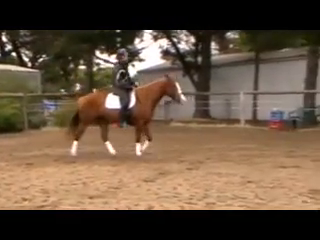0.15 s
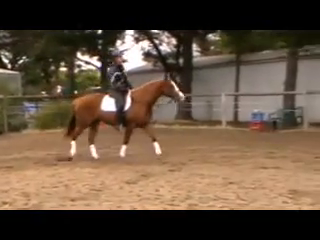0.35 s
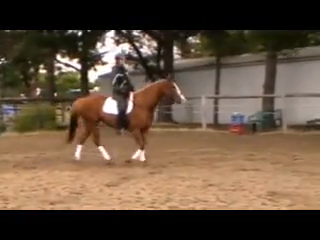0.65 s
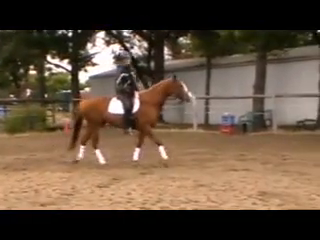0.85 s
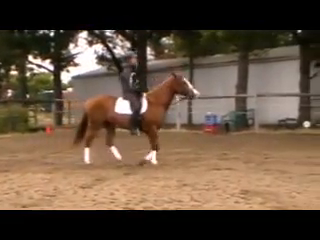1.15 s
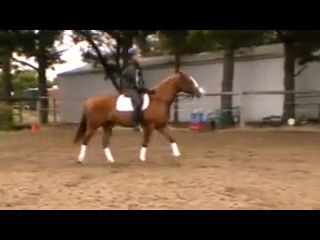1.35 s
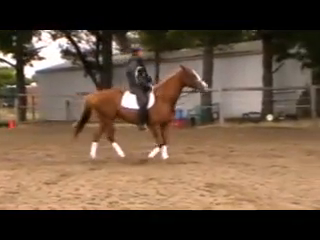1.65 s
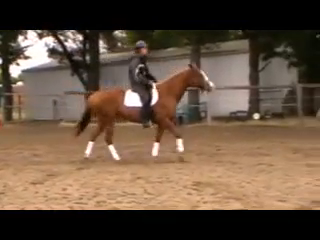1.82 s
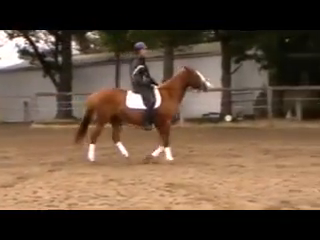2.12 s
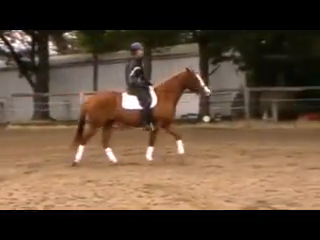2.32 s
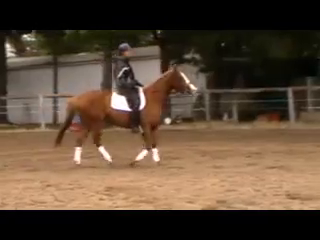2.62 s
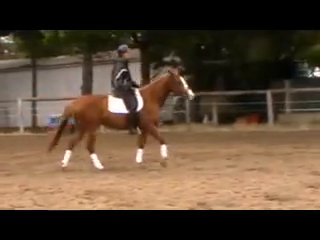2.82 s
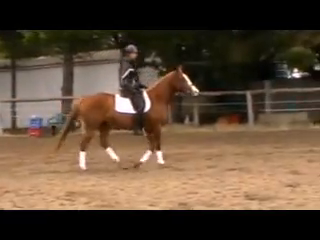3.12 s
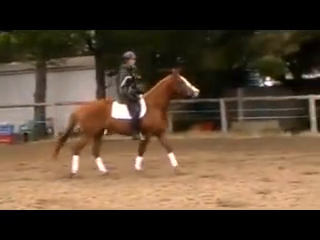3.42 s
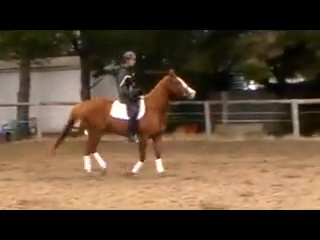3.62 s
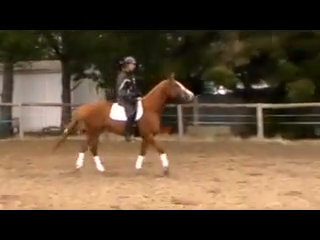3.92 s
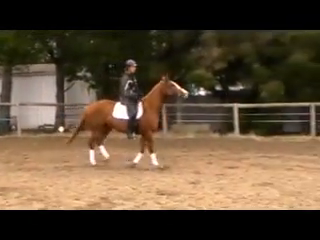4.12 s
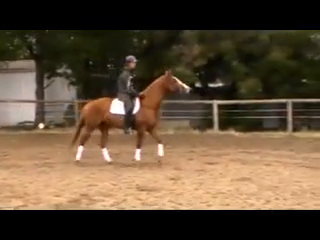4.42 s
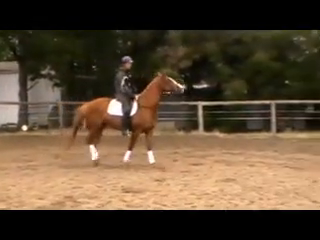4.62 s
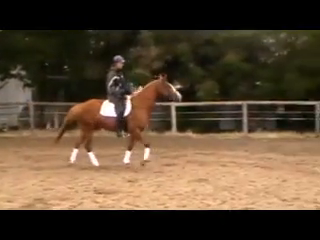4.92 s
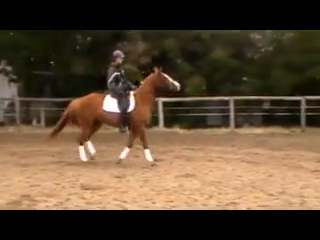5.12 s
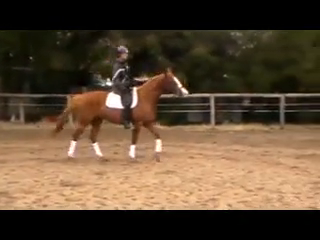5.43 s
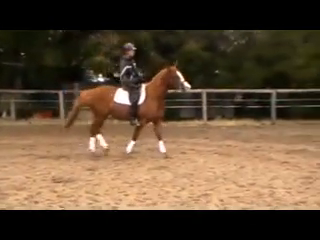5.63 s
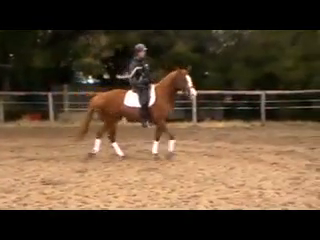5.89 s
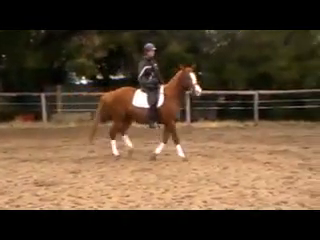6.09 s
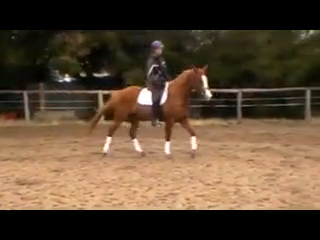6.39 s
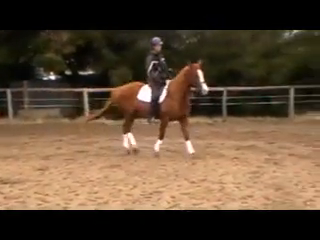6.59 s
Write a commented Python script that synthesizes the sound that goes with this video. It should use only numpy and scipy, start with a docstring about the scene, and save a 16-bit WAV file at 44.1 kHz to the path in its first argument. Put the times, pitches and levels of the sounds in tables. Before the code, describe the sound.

A horse trots faintly on sand amid chirping birds and light wind, then a nearby horse whinnies loudly, snorts and nickers.

```python
"""A nearby horse whinnies with two voices at once: a squeal doubles its period, turns hoarse and sinks
into a shaking low voice, whose folds chop the breath that rings throat and mouth. Then its nostrils
snort and slow pulses of the voice flutter into a nicker. Further off another horse trots on the sand of
an open arena. Birds whistle and chirp in the trees, and light wind buffets the microphone over a wash
of leaves and distant traffic."""
import sys
import numpy as np
from scipy import signal
from scipy.fft import rfft, irfft, next_fast_len
from scipy.io import wavfile
from scipy.ndimage import uniform_filter1d, map_coordinates

SR = 44100
rng = np.random.default_rng(int(sys.argv[2]) if len(sys.argv) > 2 else 0)


def wav_out(sig):
    """Save sig, one row per channel (or a flat mono array), as 16-bit PCM at SR to the path in sys.argv[1]."""
    wavfile.write(sys.argv[1], SR, np.round(np.clip(np.atleast_2d(sig).T, -1, 1) * 32767).astype(np.int16))


N = 297807
T = np.arange(N) / SR
TOP_HZ = 13200
SIDE = np.array([[1], [-1]])  # opposite signs in the left and right channels


def undb(db):
    """Amplitude ratio of a level in decibels."""
    return 10 ** (np.asarray(db) / 20)


def unit(x):
    """Normalisation to rms 1."""
    return x / np.sqrt(np.mean(x ** 2))


def noise():
    """Gaussian white noise."""
    return rng.standard_normal(N)


def walk(rate):
    """Random modulation of rms 1, interpolated between `rate` values a second."""
    return unit(map_coordinates(rng.standard_normal(int(N / SR * rate) + 3), [T * rate], order=1))


def curves(table):
    """Linear interpolation in time: one control signal for each column after the first."""
    times, *columns = np.transpose(table)
    return [np.interp(T, times, column) for column in columns]


def swell(centre_s, sigma_s):
    """Gaussian envelope."""
    return np.exp(-np.minimum(((T - centre_s) / sigma_s) ** 2, 100) / 2)


def sounding(table, fade_s=0.026):
    """Trapezoidal gate: 1 within a table's time span, fading to 0 outside it."""
    return np.clip(np.minimum(T - table[0][0], table[-1][0] - T) / fade_s + 1, 0, 1)


def add(out, start_s, sound):
    """Superposition of a sound from a given time on."""
    span = out[max(int(start_s * SR), 0):][:len(sound)]
    span += sound[:len(span)]


def colour_at(spectrum, hz):
    """Gain of a spectral envelope (f/Hz, level/dB) at given frequencies."""
    f, db = np.transpose(spectrum)
    return undb(np.interp(np.log(hz), np.log(f), db))


def coloured(spectrum):
    """Spectral shaping of white noise, at rms 1."""
    size = next_fast_len(N)
    hz = np.maximum(np.arange(size // 2 + 1) * SR / size, 1)
    return unit(irfft(rfft(noise(), size) * colour_at(spectrum, hz), size)[:N])


def ring(x, hz, width_hz):
    """Resonance: two equal resonators in cascade, for steep skirts."""
    b, a = signal.iirpeak(min(hz, .45 * SR), hz / width_hz, fs=SR)
    return signal.lfilter(b, a, signal.lfilter(b, a, x + 1e-18))


def place(x, pan_db, wet_db, t60, first_s, width=0.37, treble_width=0.56):
    """Scattering by fence, shed and trees adds a decaying tail; the ears differ most in the treble."""
    t = T[:SR]
    decay = np.exp(-np.log(1000) * t / t60) * np.clip(t / first_s - 1, 0, 1)
    mid, side = rng.standard_normal((2, SR)) * decay
    side = width * side + treble_width * np.diff(side, prepend=0)
    tail = (mid + side * SIDE) / np.sqrt(np.sum(mid ** 2))
    echo = signal.fftconvolve(x[None], tail, axes=1)[:, :N]
    return (x + undb(wet_db) * echo) * undb(pan_db * SIDE / 2)


def ambience(level_db=-46):
    """Incoherent sources, trees and distant traffic, sum to a soft, steady noise."""
    # spectrum of the wash: f/Hz, relative level/dB
    spectrum = [(18, -45), (30, 7.5), (101, 0.5), (454, -9), (709, -6), (842, -12.5), (1030, -10.5),
                (1900, -18.5), (7410, -23.5), (11100, -33.5), (12600, -113), (22000, -120)]
    return undb(level_db + 0.74 * walk(5.08)) * (coloured(spectrum) + undb(-11) * coloured(spectrum) * SIDE)


def wind(breeze_db=-51, buffet_s=0.0043):
    """Turbulent pressure rumbles and thumps on the microphone, only partly coherent at its two ports."""
    # spectrum of the eddies: f/Hz, relative level/dB
    eddies = [(20, -22), (45, -6), (90, 0.5), (140, -2), (220, -8.5), (400, -19.5), (800, -33), (2000, -52),
              (6000, -86)]
    # gusts: t/s, Gaussian width/s, level/dB
    gusts = [(0.081, 0.057, -30), (0.383, 0.063, -25.5), (0.663, 0.067, -29), (1.58, .062, -37),
             (2.02, 0.079, -40), (2.39, 0.22, -50.5), (4.52, .09, -36), (5.86, 0.084, -35.5),
             (6.71, 0.13, -29)]
    # sharp buffets within the gusts: t/s, level/dB
    buffets = [(.262, -26), (0.348, -23), (.373, -20.5), (0.439, -25), (1.63, -30), (1.654, -24.5),
               (1.951, -34), (2.05, -34.5)]
    force = undb(breeze_db) + sum(undb(db) * swell(s, sigma) for s, sigma, db in gusts)
    force *= undb(2.3 * walk(40) - 1)
    rumble = coloured(eddies) * undb(1.1 * SIDE) + undb(-4) * coloured(eddies) * SIDE
    blows = sum(undb(db) * swell(s + buffet_s, buffet_s) for s, db in buffets)
    thumps = blows * coloured([(40, 2), (200, 6), (450, -8), (900, -20), (2000, -34.5), (6000, -71)])
    return force * rumble + thumps * undb(2 * SIDE)


def trot():
    """Granular impact: hooves sink into sand with a faint thud and throw a spray of grains."""
    # hoof falls: t/s, Gaussian width/s, level/dB
    steps = [(0.581, 0.022, -46), (0.987, 0.027, -52), (1.534, 0.015, -51), (2.033, 0.013, -56),
             (2.49, 0.014, -48), (2.917, 0.043, -50), (3.001, 0.0096, -49), (3.523, 0.071, -53.5),
             (5.618, 0.023, -46)]
    push = sum(undb(db) * swell(s, sigma) for s, sigma, db in steps)
    grains = noise() * undb(3 * walk(350))
    spray = undb(-0.5) * unit(ring(grains, 4170, 6500))
    thud = undb(-5) * unit(ring(noise(), 130, 200))
    return push * (spray + thud)


def whistle(hz, waver, overtone_db):
    """Random frequency and amplitude modulation roughens a bird's tone and its octave."""
    t = np.arange(len(hz)) / SR
    tremble = map_coordinates(rng.standard_normal(400), [t * 800], order=1)
    flicker = map_coordinates(rng.standard_normal(400), [t * 240], order=1)
    phase = 2 * np.pi * np.cumsum(hz * (1 + waver * tremble)) / SR
    return undb(4.03 * flicker) * (np.sin(phase) + undb(overtone_db) * np.sin(2 * phase))


def chirps(arch_depth=0.29, sink_ratio=0.9, fade_db=-3.5):
    """Parabolic frequency sweeps make a bird's raspy strokes, each lower and weaker than the last."""
    # runs of strokes: t/s, count, spacing/s, stroke duration/s, first peak f/Hz, level/dB
    runs = [(.065, 3, .034, 0.052, 4480, -46), (.572, 3, 0.039, 0.055, 4160, -36.5),
            (.878, 1, .05, 0.041, 4520, -48.5), (.945, 2, .036, .045, 4380, -46),
            (1.133, 2, 0.035, 0.037, 4500, -51.5), (1.281, 2, .098, 0.056, 4900, -36.5),
            (2.121, 3, .036, 0.039, 4194, -35.5), (2.385, 2, .045, .04, 4610, -47.5),
            (2.768, 1, .05, 0.067, 4350, -52), (3.175, 1, .05, 0.084, 3850, -49.5),
            (3.345, 2, .078, 0.069, 5140, -41.5)]
    out = np.zeros(N)
    for s, strokes, spacing_s, length, top_hz, db in runs:
        u = np.linspace(0, 1, int(length * SR))
        arch_hz = top_hz * (1 - arch_depth * (2 * u - 1) ** 2)
        for k in range(strokes):
            tone = whistle(arch_hz * sink_ratio ** k, waver=0.0514, overtone_db=-23.5)
            add(out, s + k * spacing_s, undb(db + 2.5 + k * fade_db) * np.sin(np.pi * u) * tone)
    return out


def seeps(under_ratio=0.7, under_db=-20):
    """Frequency glides: thin bird calls sweep up and hook down over a faint, rough second voice."""
    # calls: t/s, duration/s, starting f/Hz, peak f/Hz, level/dB
    calls = [(1.065, 0.097, 4300, 6790, -41.5), (1.777, 0.072, 3980, 7010, -33),
             (2.311, .075, 4795, 7020, -34.5), (4.285, .07, 6040, 7480, -29.5),
             (5.826, 0.048, 5500, 7060, -26), (6.335, .085, 4600, 6830, -28.5),
             (6.385, .095, 6280, 6890, -31), (6.587, .066, 6210, 7480, -26)]
    # contour of every call: fraction of the duration, fraction of the climb, relative level/dB
    arc = [(0, 0, -18.5), (.2, .3, -9), (.36, .72, -2), (.65, 1, 0), (.84, .92, -1), (1, 0.66, -8.5)]
    along, climb, shape_db = np.transpose(arc)
    out = np.zeros(N)
    for s, length, start_hz, top_hz, db in calls:
        u = np.linspace(0, 1, int(length * SR))
        hz = start_hz + (top_hz - start_hz) * np.interp(u, along, climb)
        upper = whistle(hz, waver=0.028, overtone_db=-24)
        under = undb(under_db) * whistle(under_ratio * hz, waver=0.08, overtone_db=-5.5)
        add(out, s, undb(db + 3 + np.interp(u, along, shape_db)) * (upper + under))
    return out


def clicks(decay_s=0.002):
    """Transients: broad bands of noise start abruptly and decay exponentially."""
    # small clicks around the calls: t/s, centre f/Hz, level/dB
    bursts = [(.592, 6700, -34), (3.997, 1760, -36.5), (4.035, 3580, -24.5), (5.161, 1968, -31),
              (6.251, 4500, -32.5)]
    out = np.zeros(N)
    for s, hz, db in bursts:
        decay = (T >= s) * np.exp(-np.minimum(abs(T - s) / decay_s, 20))
        out += undb(db) * decay * unit(ring(noise(), hz, 1.67 * hz))
    return out


def snorts():
    """Turbulent jets: the nostrils flap open, and each burst whistles briefly over a wide hiss."""
    # nostril flaps that open the nicker: t/s, resonance f/Hz, Gaussian width/s, level/dB
    flaps = [(5.778, 3220, 0.0074, -23.5), (5.809, 3120, 0.0047, -22.5), (5.828, 3530, 0.0029, -17),
             (5.848, 3480, 0.0022, -21)]
    hiss = undb(-8.5) * unit(ring(noise(), 5300, 8200))
    return sum(undb(db) * swell(s, sigma) * (unit(ring(noise(), hz, 680)) + hiss)
               for s, hz, sigma, db in flaps)


def tract(x, formants, low_hz, high_hz, flicker_db=2.5):
    """Formant filtering within one band, at rms 1; the soft walls quiver and vary each formant's gain."""
    return unit(sum((-1) ** k * undb(db + flicker_db * walk(35)) * ring(x, hz, width)
                    for k, (hz, width, db) in enumerate(formants) if low_hz < hz <= high_hz))


def nicker():
    """Pulse excitation: slow, uneven pulses thump the chest, each letting a puff through the nose."""
    # envelopes: t/s, voice level/dB, nostril hiss level/dB
    levels = [(5.73, -50, -49.5), (5.79, -34.5, -41), (5.95, -32.5, -36), (6.1, -27, -38),
              (6.2, -32.5, -43.5), (6.295, -50, -62)]
    # beat of the voice: t/s, pulse rate/Hz
    flutter = [(5.85, 44.8), (5.92, 63), (5.99, 91), (6.15, 80), (6.3, 96.5)]
    # resonances with the lips closed: f/Hz, bandwidth/Hz, relative level/dB
    formants = [(145, 103, 9), (598, 140, -8), (982, 210, -7.5), (1535, 180, -9), (1900, 520, -14),
                (2930, 160, -6.5), (3490, 390, -8.5), (4450, 480, -13), (5400, 1400, -15),
                (7000, 1700, -17.5), (8400, 1500, -9.5), (9800, 9500, -27.5)]
    voice, hiss = sounding(levels) * undb(curves(levels))
    cycles = np.cumsum(curves(flutter)[0] * (1 + 0.15 * walk(70))) / SR
    strength = undb(0.88 * walk(80))
    pulses = unit(np.diff(np.floor(cycles), prepend=0) * strength)
    puffs = unit(noise() * (np.exp(-(cycles % 1) / 0.33) + 0.27) * strength)
    drive = puffs + 0.5 * pulses
    chest = undb(3.5) * tract(pulses + 0.12 * puffs, formants, 0, 400)
    head = undb(0.9) * tract(drive, formants, 400, 1200) + undb(-3.5) * tract(drive, formants, 1200, 2700)
    return voice * (chest + head) + undb(5) * hiss * tract(puffs, formants, 2700, SR)


def shake(first_crest_s=4.606, rate_hz=8.9, slowing_hz_per_s=2.4):
    """Modulation by the belly, -1 to 1; it slows as the horse runs out of air."""
    t = T - first_crest_s
    cycles = rate_hz * t - slowing_hz_per_s * t ** 2 / 2
    return np.cos(2 * np.pi * cycles) * np.clip(t * rate_hz + 1, 0, 1)


def registers(break_s=0.018):
    """Regimes of oscillation: the high voice holds each quality until the next quick break."""
    # regimes: starting t/s, subharmonic level/dB, roughness 0-1, tonal share 0-1, treble level/dB
    regimes = [(4.12, -11, 0.49, 0.71, -4), (4.247, 5, .05, 0.9, -2), (4.399, -11.5, .38, 0.66, -7),
               (4.605, -21, 0.86, 0.29, -7.5)]
    starts, *columns = np.transpose(regimes)
    current = np.maximum(np.searchsorted(starts, T) - 1, 0)
    return [uniform_filter1d(column[current], int(break_s * SR)) for column in columns]


def squeal(hz, subharmonic_db, rough, jitter=0.03215, wear_db=14):
    """Period doubling puts lines halfway between the harmonics; roughness wears off the upper ones."""
    # spectral envelope of the partials: f/Hz, relative level/dB
    spectrum = [(730, -21.5), (1000, -1), (1350, -3), (1600, -3.5), (2250, 2), (2750, -26), (3200, -2.5),
                (3700, -0.5), (4500, 0.5), (4950, -25), (5800, -19), (9000, -11), (13000, -29)]
    half_hz = hz / 2 * (1 + jitter * rough * (walk(420) + 0.599 * walk(60)))
    phase = 2 * np.pi * np.cumsum(half_hz) / SR
    subharmonic, wear = undb(subharmonic_db), undb(-wear_db * rough / 2)
    out, power = 0, 0
    for k in range(1, 16):
        amplitude = colour_at(spectrum, k * half_hz) * (k * half_hz < TOP_HZ)
        amplitude *= (subharmonic if k % 2 else 1) * wear ** k
        out += amplitude * np.sin(k * phase)
        power += amplitude ** 2 / 2
    return out / np.sqrt(power)


def whinny(shake_db=2, high_swing_share=0.396):
    """Biphonation: two voices shake together; the low one chops the breath that rings throat and mouth."""
    # the high voice scoops up, climbs, leaps and dies away: t/s, f/Hz, level/dB
    high_voice = [(4.125, 1004, -50), (4.155, 956, -35.5), (4.178, 1272, -23.5), (4.25, 1443, -25.5),
                  (4.39, 1498, -20), (4.42, 1555, -16.5), (4.595, 1597, -18.5), (4.66, 2050, -20),
                  (4.97, 2244, -20.5), (5.2, 2100, -22), (5.37, 1694, -31), (5.52, 1600, -54.5)]
    # the low voice sinks and ends in a last push: t/s, f/Hz, relative pitch swing, level/dB
    low_voice = [(4.42, 281.9, 0, -36.5), (4.62, 300.3, .04, -24), (4.69, 264.8, 0.1157, -24.5),
                 (4.93, 250, .16, -25.5), (5.03, 207.2, 0.1927, -24), (5.21, 195.1, .2, -22),
                 (5.28, 154.7, 0.096, -28), (5.328, 164.2, 0.032, -18.5), (5.372, 153.2, 0.015, -34),
                 (5.51, 145.6, 0.0016, -48)]
    # the chest radiates only deep notes: f/Hz, gain/dB
    radiation = [(165, 7), (205, 4.5), (245, 4.5), (275, -11), (300, -26.5)]
    # resonances of the head with the mouth open: f/Hz, bandwidth/Hz, relative level/dB
    formants = [(580, 110, 4), (960, 210, 1.5), (1610, 376, -3), (1960, 310, -13), (2254, 203, 1),
                (3260, 800, -13.5), (3765, 186, -12), (4160, 430, -21), (5790, 840, -17.5),
                (6540, 2200, -25.5), (8740, 5000, -28)]
    high_hz, high_db = curves(high_voice)
    low_hz, swing, low_db = curves(low_voice)
    subharmonic_db, rough, tonal, treble_db = registers()
    heave = shake()
    mouth_gain = sounding(high_voice) * undb(high_db + shake_db * heave)
    hiss_gain = mouth_gain * undb(treble_db)
    throat_gain = sounding(low_voice) * undb(low_db)

    low_hz = low_hz * (1 + swing * heave) * (1 + 0.022 * walk(200))
    phase = 2 * np.pi * np.cumsum(low_hz) / SR
    voicing = np.clip((T - low_voice[0][0]) / 0.064, 0, 1)
    harmonics = voicing * sum(np.sin(k * phase) for k in range(2, 5))
    closures = unit(np.diff(np.floor(phase / (2 * np.pi)), prepend=0))  # the folds snap shut once a cycle
    breath = unit(noise() * undb(4.5 * voicing * np.sin(phase) + 2 * walk(110)))
    drive = unit(breath + undb(-6) * voicing * closures)

    chest = throat_gain * colour_at(radiation, low_hz) * np.sin(phase) * undb(2 + 1.95 * walk(70))
    voiced = throat_gain * (1 + tonal) * unit(ring(harmonics, 587, 200)) * undb(-10.5 + 2.9 * walk(120))
    throaty = (undb(-3.5) * throat_gain + undb(-18.5) * mouth_gain) * tract(drive, formants, 0, 1200)
    rasp = undb(-0.9) * mouth_gain * tract(drive, formants, 1200, 2700)
    hiss = undb(2) * hiss_gain * tract(drive, formants, 2700, SR)
    tone = squeal(high_hz * (1 + high_swing_share * swing * heave), subharmonic_db, rough)
    high = np.hypot(mouth_gain, hiss_gain) * tone * undb(-0.6 + 1.9 * rough * walk(300))
    return chest + voiced + np.sqrt(1 - tonal) * (throaty + rasp + hiss) + np.sqrt(tonal) * high


def scene():
    """Direct-to-reverberant ratio conveys distance: the calling horse is nearest, the chirps deepest."""
    horse = place(whinny() + nicker() + snorts() + clicks(), pan_db=1.3, wet_db=-8, t60=0.34, first_s=0.0012)
    near_trees = place(seeps(), pan_db=1.8, wet_db=-6.5, t60=0.56, first_s=0.0019)
    far_trees = place(chirps(), pan_db=3.2, wet_db=-4, t60=0.44, first_s=0.0018)
    return horse + near_trees + far_trees + trot() + wind() + ambience()


def record(dry):
    """Band limiting: two low-pass filters dull the highest treble and cut off above it."""
    soft = signal.sosfilt(signal.butter(6, 11900, fs=SR, output="sos"), dry)
    return signal.sosfilt(signal.ellip(8, 0.2, 70, TOP_HZ, fs=SR, output="sos"), soft)


dry = scene()
out = record(dry)
wav_out(out)
```